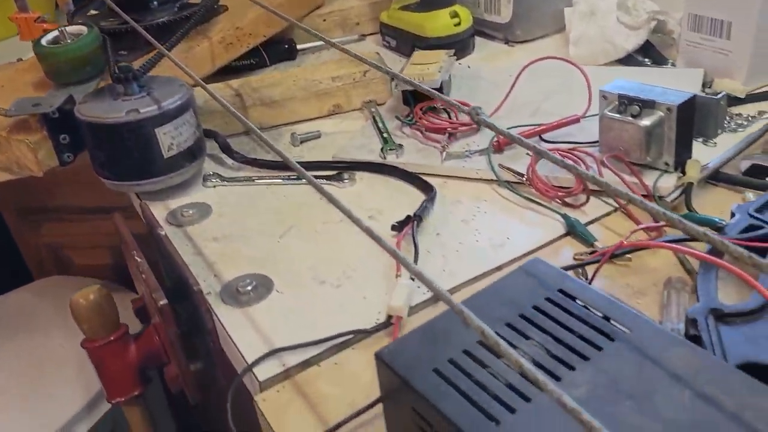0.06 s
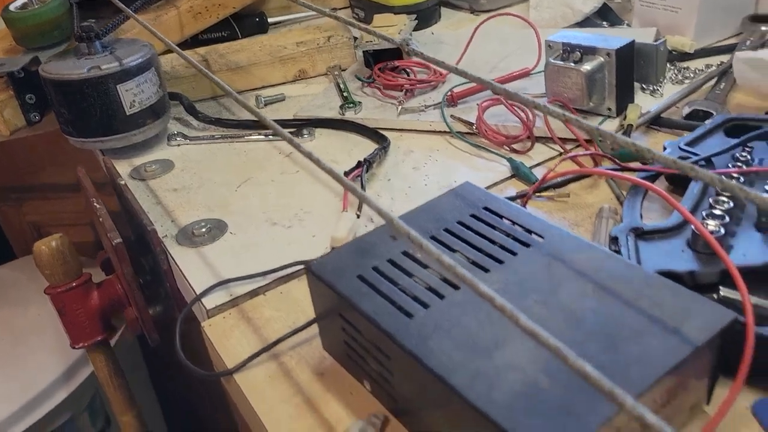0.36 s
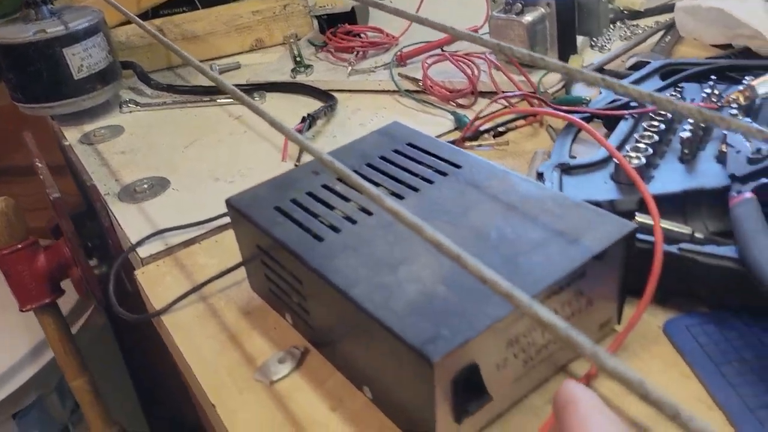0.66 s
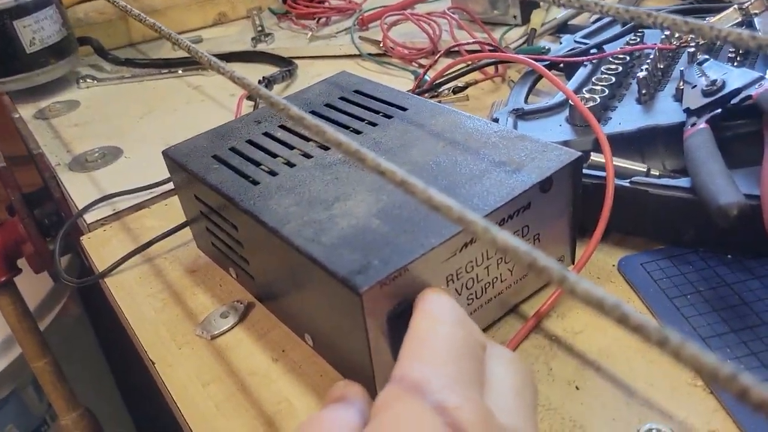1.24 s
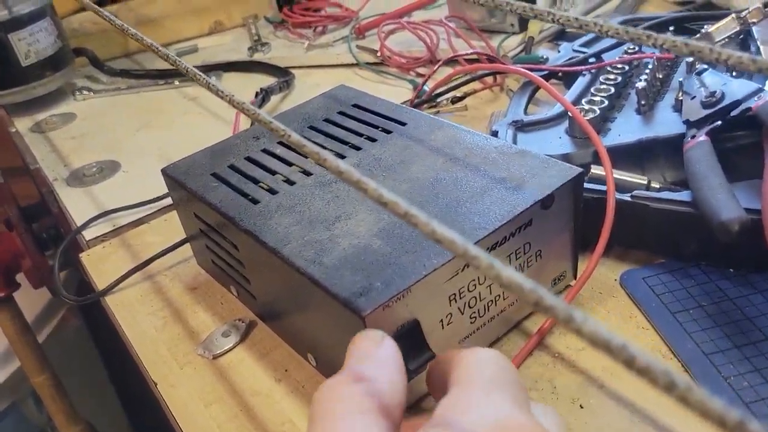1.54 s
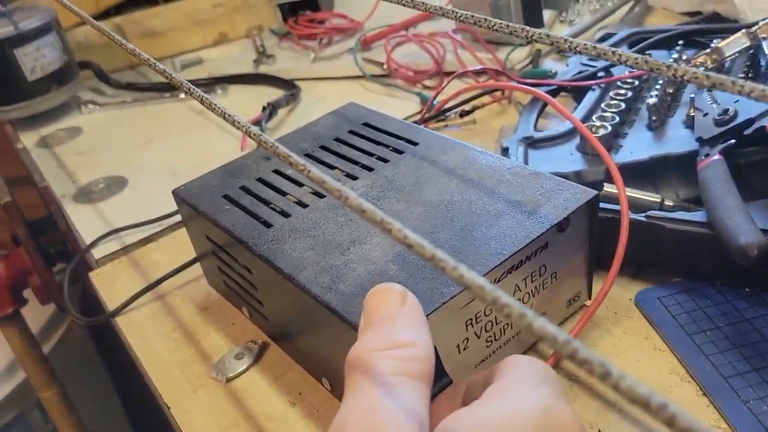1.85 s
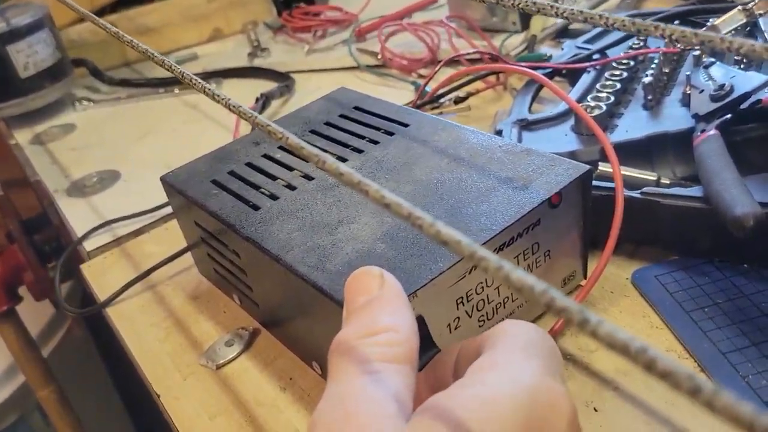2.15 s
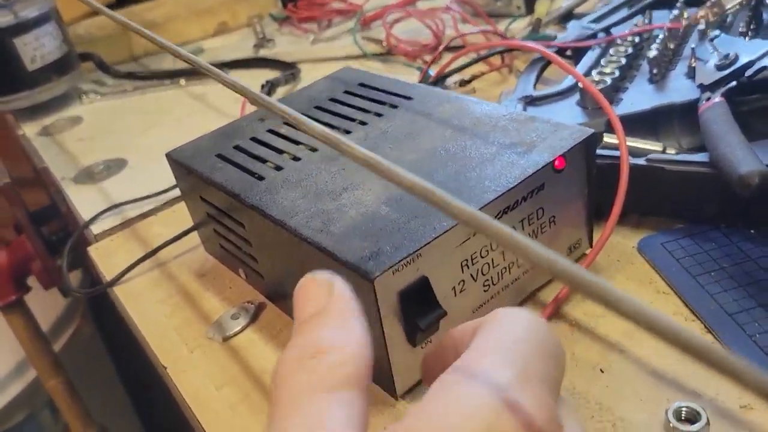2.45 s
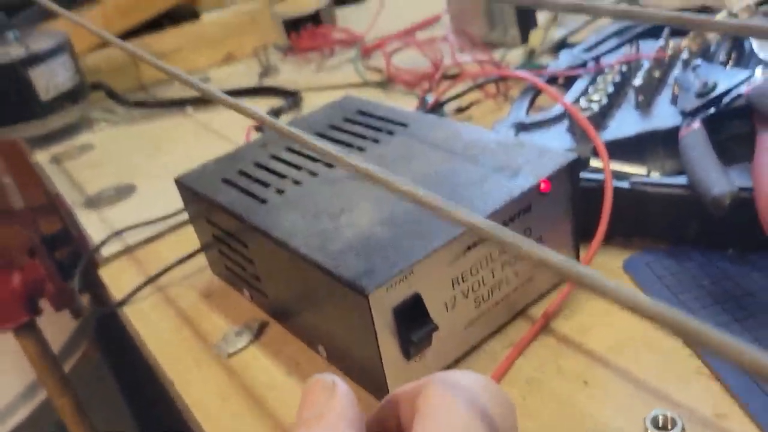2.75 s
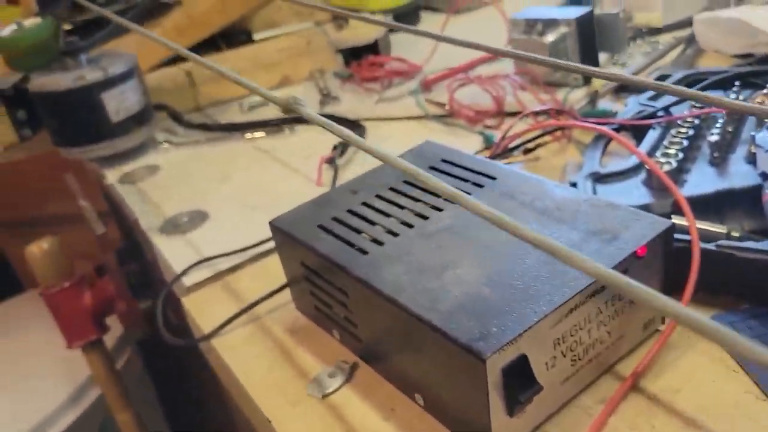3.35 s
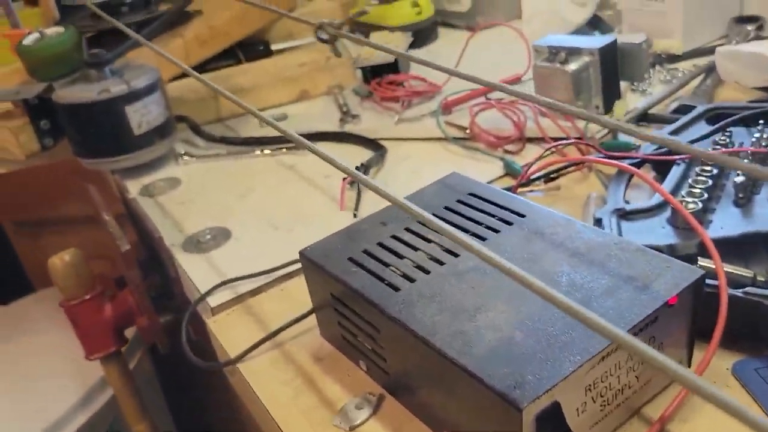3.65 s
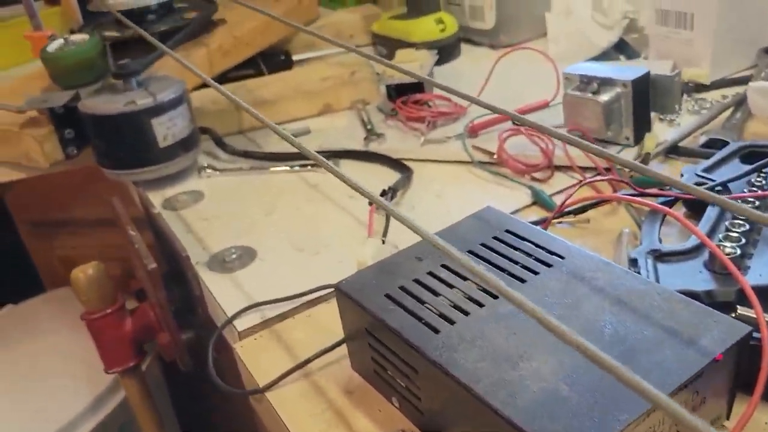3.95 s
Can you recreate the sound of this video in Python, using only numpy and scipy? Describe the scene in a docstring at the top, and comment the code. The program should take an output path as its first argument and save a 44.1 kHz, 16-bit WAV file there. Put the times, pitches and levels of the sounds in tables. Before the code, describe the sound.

A moving rope rubs the hand-held microphone with a loud rising zip, just after a switch clicks and a motor starts in a quiet room. The rope slaps free, and the motor whines on over rumbling pulleys.

```python
"""A workbench in a quiet room, heard from a hand-held recorder. A rocker switch snaps on a steel power
supply and a motor spins up, pulling a rope loop. For half a second the speeding rope rubs on the
recorder's case: its strands make a loud rising zip. Then it comes free, and the motor whines on over
the rumble of the pulleys and the hiss of the rope."""
import sys
import numpy as np
from scipy import signal
from scipy.fft import rfft, irfft
from scipy.io import wavfile
from scipy.ndimage import uniform_filter1d, minimum_filter1d

SR = 44100
rng = np.random.default_rng(int(sys.argv[2]) if len(sys.argv) > 2 else 0)


def digitize_waveform(pressure):
    """Quantize a signal to 16-bit integers and store it at the path in sys.argv[1].

    Rows of a 2-D input are taken as channels; values are limited to [-1, 1].
    """
    field = np.atleast_2d(pressure).T
    bounded = np.clip(field, -1, 1)
    quanta = np.round(bounded * 32767).astype(np.int16)
    wavfile.write(sys.argv[1], SR, quanta)


N = 176400
TIME = np.arange(N) / SR
FREQS = np.arange(N // 2 + 1) * SR / N
SIDES = np.array([[1], [-1]])   # left, right


def from_db(db):
    """Decibels to gain."""
    return 10 ** (np.asarray(db) / 20)


def rms_one(x):
    """Scale to rms 1."""
    return x / np.sqrt(np.mean(x ** 2) + 1e-20)


def in_time(rows):
    """Each column of a curve at every sample."""
    times, *columns = np.transpose(rows)
    return [np.interp(TIME, times, column) for column in columns]


def at_hz(rows, hz):
    """Each column of a spectrum at the given frequencies."""
    knots_hz, *columns = np.transpose(rows)
    return [np.interp(np.log(hz + 1e-9), np.log(knots_hz), column) for column in columns]


def drift(rate_hz):
    """Low-passed random wander, rms 1."""
    return rms_one(irfft(rfft(rng.standard_normal(N)) / (1 + (FREQS / rate_hz) ** 2), N))


def jittered_phase(hz, jitter, drift_hz):
    """Phase in radians of a rate that wanders by the fraction jitter."""
    return 2 * np.pi * np.cumsum(hz * (1 + jitter * drift(drift_hz))) / SR


def colour(x, spectrum):
    """Shape to a spectrum, rolled off below 15 Hz; rms 1."""
    low_cut = FREQS ** 2 / (FREQS ** 2 + 15 ** 2)
    return rms_one(irfft(rfft(x) * from_db(at_hz(spectrum, FREQS)[0]) * low_cut, N))


def ripple(x, depth_db, bins=260):
    """Many close resonances put narrow peaks and dips on the treble."""
    noise = rng.standard_normal((2, len(FREQS)))
    peaks = rms_one(uniform_filter1d(uniform_filter1d(noise, bins), bins))
    return irfft(rfft(x) * from_db(depth_db * peaks * FREQS / (FREQS + 700)), N)


def bandpass(order, low_hz, high_hz):
    """Butterworth band-pass sections."""
    return signal.butter(order, [low_hz, high_hz], "band", fs=SR, output="sos")


def swell(centre_s, half_s):
    """Gaussian rise and fall."""
    return np.exp(-((TIME - centre_s) / half_s) ** 2)


def decay(start_s, t60_s):
    """Sudden start, exponential fall."""
    return (TIME >= start_s) * from_db(-60 * np.clip((TIME - start_s) / t60_s, 0, 4))


def ring(start_s, hz, t60_s):
    """One struck mode."""
    return decay(start_s, t60_s) * np.sin(2 * np.pi * hz * (TIME - start_s))


def snap(start_s, db, t60_s, low_hz, high_hz, tail_db=-30):
    """A short crack with a tail from the room."""
    envelope = decay(start_s, t60_s) + from_db(tail_db) * decay(start_s, t60_s=0.16)
    burst = rng.standard_normal((2, N)) * envelope + 1e-18
    band = bandpass(2, low_hz, high_hz)
    makeup = np.sqrt(SR / 2 / (high_hz - low_hz))
    return from_db(db) * makeup * signal.sosfilt(band, signal.sosfilt(band, burst))


# Each row: frequency in Hz, left-right correlation.
CORRELATION = [(60, 0.88), (160, 1), (280, 0.28), (450, 0.022), (740, 0.33), (1200, -0.095), (2000, -0.19),
               (5000, 0.035), (15000, -0.15)]

def airborne(spectrum, balance, flicker_db):
    """Stereo noise, alike in the bass, nearly unrelated in the treble; each band flickers on its own."""
    alike, = at_hz(CORRELATION, FREQS)
    mid, side = rfft(ripple(rng.standard_normal((2, N)), depth_db=1.8))
    pair = np.sqrt(1 + alike) * mid + np.sqrt(1 - alike) * side * SIDES
    pair *= from_db(at_hz(balance, FREQS)[0] * SIDES / 2)
    band = np.searchsorted([200, 500, 750, 950, 1300, 1900, 3000, 6000], FREQS)
    noise = sum(irfft(pair * (band == k), N) * from_db(flicker_db * drift(21.4)) for k in np.unique(band))
    return colour(noise, spectrum)


# Each row: frequency in Hz, relative density in dB.
ROOM_SPECTRUM = [(15, -37), (25, 6), (39, -5.5), (70, 2), (100, -11.5), (190, -26.5), (335, -35),
                 (430, -32.5), (530, -26), (660, -30.5), (960, -36), (1700, -36.5), (3100, -44.5),
                 (9200, -52.5), (11000, -62.5), (16000, -61)]
# Each row: frequency in Hz, left minus right in dB.
ROOM_BALANCE = [(60, 3.5), (300, -2), (530, 2), (1000, -5.5), (1600, 4), (4000, 2.5), (9000, 7.5)]
# Each row: time in seconds, offset from ROOM_DB in dB.
ROOM_TRIM = [(0, 0.5), (.7, 2), (1.5, 0), (2.15, 0.5)]
ROOM_DB = -46.5

def room():
    """Faint, bass-heavy room noise."""
    gain = from_db(ROOM_DB + in_time(ROOM_TRIM)[0])
    return gain * airborne(ROOM_SPECTRUM, ROOM_BALANCE, flicker_db=0.6)


# Each row: start in seconds, thump in dB, knock in dB.
GRIP_BUMPS = [(.254, -31, -37), (0.275, -31, -37), (.351, -33, -51), (.634, -30.5, -43), (.884, -29, -50),
              (.904, -30, -51), (1.034, -31.5, -43), (1.424, -29, -50), (1.646, -38.5, -31),
              (2.533, -27, -45), (2.933, -22, -45)]
# Each row: start in seconds, level in dB, t60 in seconds, low and high edge in Hz.
GRIP_TICKS = [(0.568, -43, 0.024, 378, 1250), (1.6454, -37, .012, 250, 1410)]
# Each row: centre in seconds, level in dB, half length in seconds.
FINGER_BRUSHES = [(1.586, -59.5, 0.059), (1.68, -60, 0.054), (1.925, -59, 0.031)]
# Each row: frequency in Hz, relative density in dB.
BRUSH_SPECTRUM = [(150, 2), (600, 7), (1500, -6), (4000, -17), (9000, -32), (12000, -35)]

def handling():
    """A shifting grip thumps and ticks on the case; fingers brush the supply's front."""
    bumps = sum(from_db(thump_db) * ring(s, hz=68.2, t60_s=0.15)
                + from_db(knock_db) * ring(s, hz=270, t60_s=0.0073)
                for s, thump_db, knock_db in GRIP_BUMPS)
    ticks = sum(snap(*row) for row in GRIP_TICKS)
    strokes = sum(from_db(db) * swell(s, half_s) for s, db, half_s in FINGER_BRUSHES)
    brushes = strokes * colour(rng.standard_normal((2, N)), BRUSH_SPECTRUM)
    return bumps * from_db(1.2 * SIDES) + ticks + brushes


# Each row: start in seconds, level in dB, t60 in seconds, low and high edge in Hz.
ROCKER_CLICKS = [(2.1867, -39, 0.057, 530, 1880), (2.2, -48, 0.045, 2000, 11100),
                 (2.2066, -38, 0.018, 650, 5100)]
# Each row: frequency in Hz, level in dB, t60 in seconds.
COVER_MODES = [(592, -33.5, 0.16), (700, -20, 0.057), (756, -27.5, 0.081), (1150, -31, 0.23),
               (1400, -29, 0.088)]
CLICK_TOP_HZ, COVER_STRIKE_S = 10300, 2.2115

def switch():
    """The rocker gives, snaps over and rings the supply's steel cover, too small to radiate bass."""
    clicks = sum(snap(*row, tail_db=-7) for row in ROCKER_CLICKS)
    clicks = signal.sosfilt(signal.butter(20, CLICK_TOP_HZ, fs=SR, output="sos"), clicks)
    lag_s = np.array([[0], [0.0004]])
    cover = sum(from_db(db) * ring(COVER_STRIKE_S + lag_s, hz, t60_s) for hz, db, t60_s in COVER_MODES)
    return clicks + signal.sosfilt(bandpass(4, 400, 6000), cover + 1e-18)


# Each row: centre in seconds, level in dB, half length in seconds.
PULLEY_RINGS = [(2.99, -35, 0.038), (3.53, -29.5, 0.027)]

def pulley_rings():
    """A pulley rings briefly and roughly as the rope drags over its rim."""
    envelope = sum(from_db(db) * swell(s, half_s) for s, db, half_s in PULLEY_RINGS)
    return envelope * np.sin(jittered_phase(hz=847, jitter=0.0114, drift_hz=61))


# Spin-up, then running. Each row: time in seconds, rumble and hiss in dB before trim.
LOOP_SPIN_UP = [(2.2, -83, -100), (2.24, -41, -92), (2.29, -45.5, -69), (2.325, -32, -57),
                (2.6, -28.5, -40.5)]
LOOP_RUNNING = [(2.92, -28.5, -51.5), (3.174, -27.5, -50.5), (3.304, -26, -48.5), (3.412, -30.5, -52),
                (3.524, -23.5, -44), (3.59, -25.5, -50), (3.75, -27, -48), (3.908, -25.5, -49),
                (3.96, -24.5, -46.5), (4.0, -24, -42.5)]
# Each row: frequency in Hz, relative density in dB.
RUMBLE_SPECTRUM = [(30, -27), (70, -5), (130, -2.5), (230, -8), (330, -1.5), (430, -9), (560, 4.5),
                   (690, 5), (770, -1), (930, -5.5), (1130, -6.5), (1250, -12.5), (1600, -15),
                   (2200, -28.5), (3000, -31), (6000, -42)]
HISS_SPECTRUM = [(1000, -4.5), (2500, 2), (3400, -1.5), (4100, 2), (4800, 7), (5500, 0), (6800, -10),
                 (9000, -4), (11000, -8), (13500, -3.5), (16000, -10.5)]
# Each row: frequency in Hz, left minus right in dB.
LOOP_BALANCE = [(60, -1), (450, -3), (740, -0.5), (2000, 4.5), (3300, -0.5), (5500, 1.5), (15000, -3.5)]
RUMBLE_TRIM_DB, HISS_TRIM_DB = -1, 3

def rope_loop(shaft_angle):
    """Pulleys rumble, throbbing once a shaft turn; the rope hisses, buzzing at the lowest whine line."""
    rumble_db, hiss_db = in_time(list(LOOP_SPIN_UP) + list(LOOP_RUNNING))
    rumble = from_db(rumble_db + RUMBLE_TRIM_DB) * airborne(RUMBLE_SPECTRUM, LOOP_BALANCE, flicker_db=2)
    hiss = from_db(hiss_db + HISS_TRIM_DB) * airborne(HISS_SPECTRUM, LOOP_BALANCE, flicker_db=0.8)
    throb = 1 + 0.075 * np.cos(shaft_angle)
    buzz = 1 + 0.22 * np.cos(11 * shaft_angle)
    return rumble * throb + hiss * buzz


# Each row: shaft multiple, base level in dB, left minus right in dB, left lead in radians, swing share.
WHINE_LINES = [(11, -30, -2, -0.31, 0.13), (21, -42.5, 9, 1.5, 1), (22, -27.5, -0.5, 1.2, 0.7),
               (33, -56, -8.5, -1.43, 0.43), (44, -50.5, 4.5, 1.2, 0.14)]
# Each row: time in seconds, level swing in dB.
WHINE_SWING = [(2.3, -37.5), (2.8, -2.5), (2.95, 1), (3.04, -18), (3.10, -3), (3.18, 5), (3.30, -13),
               (3.43, 5), (3.49, -3), (3.63, 1.5), (3.76, -5.5), (3.79, 2), (3.91, 9), (4, -4)]
# Each row: time in seconds, gain of the lowest line in dB.
HUM_ENTRY = [(2.3, -33.5), (2.91, -17), (2.94, 1)]
WHINE_WAVER_DB = 2.5

def motor_whine(shaft_angle):
    """Lines at multiples of the shaft rate swell and sink; the lowest comes in as the rope frees."""
    swing_db, = in_time(WHINE_SWING)
    lines = []
    for order, base_db, pan_db, lead_rad, share in WHINE_LINES:
        level_db = base_db + pan_db * SIDES / 2 + share * (swing_db + WHINE_WAVER_DB * drift(24))
        lines.append(from_db(level_db) * np.sqrt(2) * np.sin(order * shaft_angle + lead_rad * SIDES / 2))
    hum, *upper = lines
    return hum * from_db(in_time(HUM_ENTRY)[0]) + sum(upper)


# Each row: time in seconds, turns per second.
SHAFT_SPEED = [(2.22, 8), (2.45, 20), (2.6, 25.6), (2.75, 29.3), (2.92, 30.2), (3.13, 30.44), (3.9, 30.49),
               (4, 30.6)]
MOTOR_ON_S = 2.2

def drive():
    """The motor spins up and pulls the rope loop."""
    shaft_angle = jittered_phase(in_time(SHAFT_SPEED)[0], jitter=0.0045, drift_hz=8.5)
    return (TIME > MOTOR_ON_S) * (motor_whine(shaft_angle) + rope_loop(shaft_angle))


# Each row: start in seconds, level in dB, t60 in seconds, low and high edge in Hz.
ROPE_SLAPS = [(2.331, -20, 0.032, 350, 2870), (2.384, -24, .018, 1200, 2600), (2.854, -12, .016, 950, 1750),
              (2.863, -15, 0.06, 1090, 1710), (2.8823, -12, 0.02, 700, 1800)]

def rope_slaps():
    """The rope slaps the case as it jerks taut or lands again."""
    return sum(snap(*row, tail_db=-42) for row in ROPE_SLAPS)


# Each row: centre in seconds, fraction of contact lost, half length in seconds.
ROPE_BOUNCES = [(2.3813, 0.87, 0.0053), (2.746, 0.58, 0.0037), (2.846, 0.83, 0.0042), (2.858, .8, 0.0019)]
CONTACT_S, RELEASE_S = 2.3308, 2.8865

def rope_contact():
    """Contact, 0-1: the rope lands on the case, bounces a few times and comes free."""
    touching = (TIME > CONTACT_S) * (TIME < RELEASE_S) + decay(RELEASE_S, t60_s=0.012)
    dips = [1 - lost * swell(s, half_s) for s, lost, half_s in ROPE_BOUNCES]
    return touching * np.prod(dips, axis=0)


# Each row: time in seconds, level in dB before the mid and side gains.
SCRAPE_LEVEL = [(2.33, -39.5), (2.347, -25), (2.372, -41), (2.39, -32.5), (2.46, -31), (2.576, -37),
                (2.604, -33), (2.68, -37.5), (2.776, -29.5), (2.797, -35.5), (2.837, -30), (2.848, -42),
                (2.885, -35.5)]
# Each row: frequency in Hz, relative density in dB.
SCRAPE_MID_SPECTRUM = [(40, -2.5), (130, -6), (260, -4), (400, 3.5), (600, -18.5), (780, -9.5), (950, -3),
                       (1150, -14), (1600, -4), (2100, -7.5), (2500, -12), (2950, -25), (3700, -20.5),
                       (4500, -20.5), (5600, -28.5), (6600, -24), (7800, -38), (9200, -31.5), (11000, -40),
                       (16000, -42.5)]
SCRAPE_SIDE_SPECTRUM = [(40, -20), (280, -14.5), (400, -4), (475, 9.5), (560, -4), (850, 9), (1150, -9),
                        (1450, -14), (1950, 1.5), (2350, -18.5), (2700, -15.5), (3400, -23.5), (6500, -31),
                        (9000, -42), (16000, -45)]
SCRAPE_MID_DB, SCRAPE_SIDE_DB, SCRAPE_GRAIN_DB = 13.5, 20, 1

def fibre_scrape(strand_phase):
    """Fibres drag over the case: grainy noise that pulses with each strand."""
    pulsing = 1 + 0.45 * np.cos(strand_phase)
    fibres = rng.standard_normal((2, N)) * pulsing * from_db(SCRAPE_GRAIN_DB * drift(144))
    fibres = ripple(fibres, depth_db=2.3)
    mid = from_db(SCRAPE_MID_DB) * colour(fibres[0], SCRAPE_MID_SPECTRUM)
    side = from_db(SCRAPE_SIDE_DB) * colour(fibres[1], SCRAPE_SIDE_SPECTRUM)
    return from_db(in_time(SCRAPE_LEVEL)[0]) * (mid + side * SIDES)


# Rope pressure on the case. Each row: time in seconds, excitation of the fundamental in dB.
ZIP_PRESSURE = [(2.33, -16), (2.345, -6.5), (2.37, -8.5), (2.41, -6.5), (2.44, -10.5), (2.49, -6.5),
                (2.585, -8.5), (2.715, -6.5), (2.755, -6), (2.778, -17), (2.79, -5), (2.812, -17),
                (2.83, -3), (2.85, -14), (2.872, -6.5), (2.886, -20)]
# Each row: time in seconds, excitation of the overtones in dB before roll-off.
ZIP_OVERTONES = [(2.337, -3.5), (2.39, -14), (2.447, 3.5), (2.485, -1.5), (2.52, -4), (2.645, -1),
                 (2.668, 1), (2.695, -14), (2.725, 0.5), (2.748, -8), (2.774, 1), (2.80, -20), (2.885, -32)]
# Each row: frequency in Hz, mid gain in dB, side gain in dB, mid lead in radians.
CASE_RESPONSE = [(410, -0.5, 2.5, 0.59), (600, -19.5, 4.5, 1.8), (720, -29, 4, 1), (910, -7, 4, 2.33),
                 (996, -6, 1.5, 1.96), (1360, -14, -10, 4.4), (1455, -24, -20, 2.3), (1533, -6, -13, 2.8),
                 (1800, -17, -5, 0.88), (1997, -6.5, -3.5, 1.75), (2250, -9.5, -17, 1.6),
                 (2850, -33, -18, 3.5), (6060, -16.5, -30, 2.1)]
ROLLOFF_DB_PER_OCTAVE, SHIMMER_DB = 8, 1

def strand_zip(strand_phase):
    """Each strand flicks the case; the fundamental shakes the two microphones mostly in opposition."""
    rate_hz, = in_time(STRAND_RATE)
    pressure_db, = in_time(ZIP_PRESSURE)
    overtone_db, = in_time(ZIP_OVERTONES)
    mid, side = 0, 0
    for k in range(1, 6):
        mid_db, side_db, lead_rad = at_hz(CASE_RESPONSE, k * rate_hz)
        level_db = (pressure_db if k == 1 else overtone_db) - ROLLOFF_DB_PER_OCTAVE * np.log2(k)
        level_db += SHIMMER_DB * np.sqrt(k) * drift(86)
        mid += from_db(level_db + mid_db) * np.cos(k * strand_phase + lead_rad)
        side += from_db(level_db + side_db) * np.cos(k * strand_phase)
    return mid + side * SIDES


# Each row: time in seconds, strands passing the case per second.
STRAND_RATE = [(2.33, 408.7), (2.365, 477), (2.402, 494.5), (2.415, 582.7), (2.447, 662.3), (2.462, 630.2),
               (2.478, 752.5), (2.497, 705), (2.52, 780.8), (2.538, 755.5), (2.585, 848), (2.615, 816),
               (2.63, 860.8), (2.645, 838.8), (2.667, 922.5), (2.688, 855.7), (2.722, 1000), (2.745, 910.7),
               (2.768, 1031), (2.805, 922.6), (2.825, 989), (2.845, 961.4), (2.878, 1036)]
BRAID_STRANDS, BRAID_DEPTH = 8, 0.3

def rope_rub():
    """The speeding rope zips and scrapes on the case, roughened by the braid's repeating pattern."""
    strand_phase = jittered_phase(in_time(STRAND_RATE)[0], jitter=0.01972, drift_hz=212)
    rub = strand_zip(strand_phase) + fibre_scrape(strand_phase)
    braid = 1 + BRAID_DEPTH * np.cos(strand_phase / BRAID_STRANDS + drift(34))
    return rope_contact() * rub * braid


def scene():
    """All sources, in stereo."""
    return room() + handling() + switch() + drive() + pulley_rings() + rope_rub() + rope_slaps()


CEILING, LIMITER_S, CUTOFF_HZ = 0.98, 0.0012, 16000

def record(dry):
    """A fast limiter holds the peaks; a steep low-pass cuts the top."""
    window = int(LIMITER_S * SR)
    needed_gain = np.minimum(1, CEILING / (np.abs(dry).max(axis=0) + 1e-9))
    limited = dry * uniform_filter1d(minimum_filter1d(needed_gain, window), window)
    return signal.sosfilt(signal.ellip(12, 0.1, 80, CUTOFF_HZ, fs=SR, output="sos"), limited)


dry = scene()
out = record(dry)
digitize_waveform(out)
```